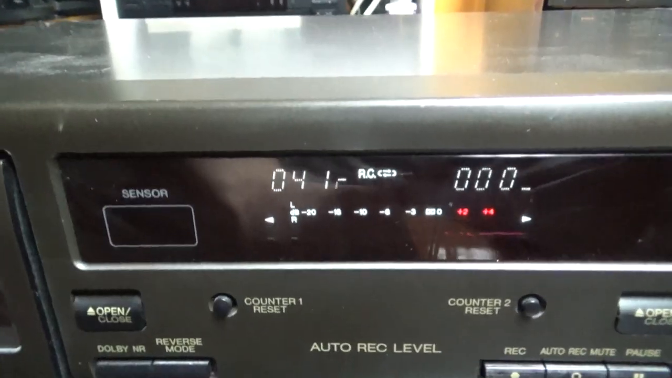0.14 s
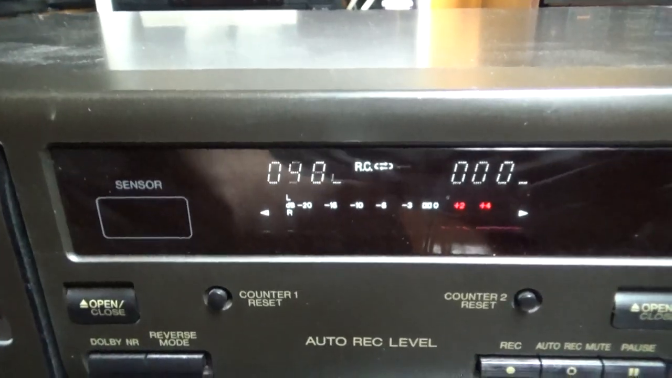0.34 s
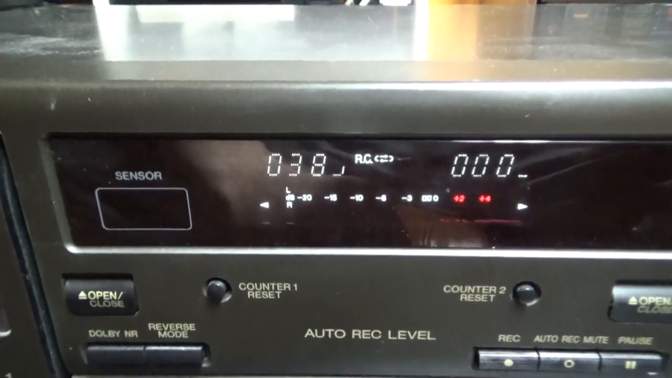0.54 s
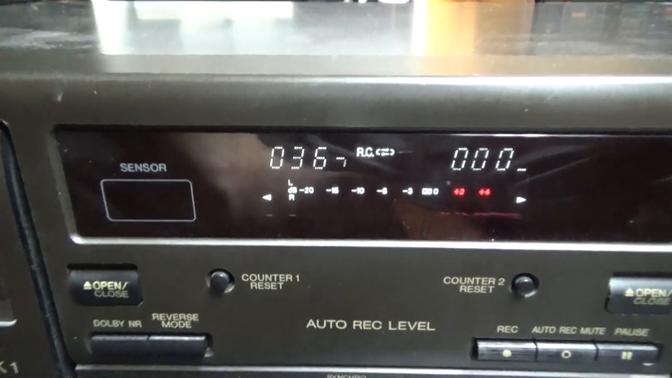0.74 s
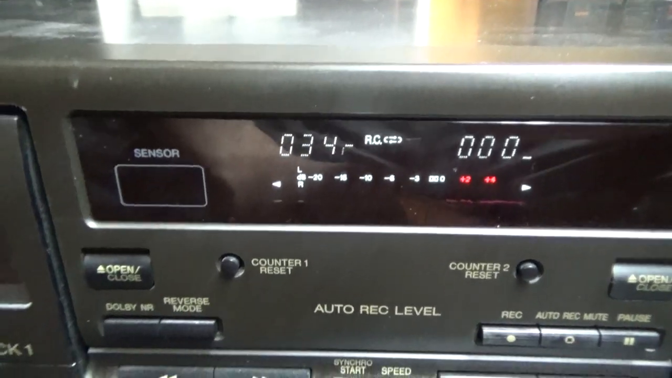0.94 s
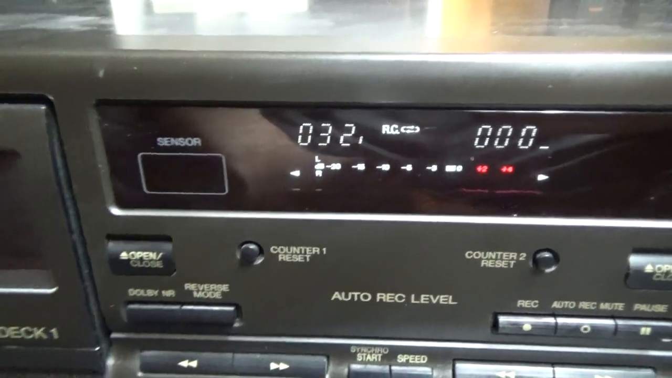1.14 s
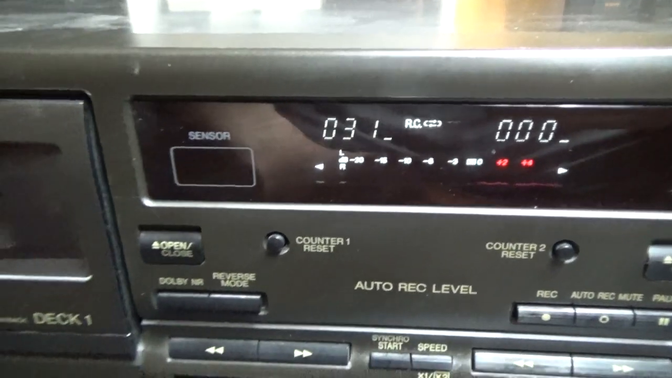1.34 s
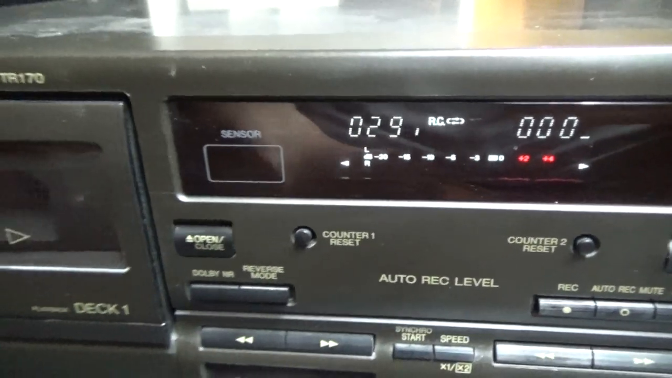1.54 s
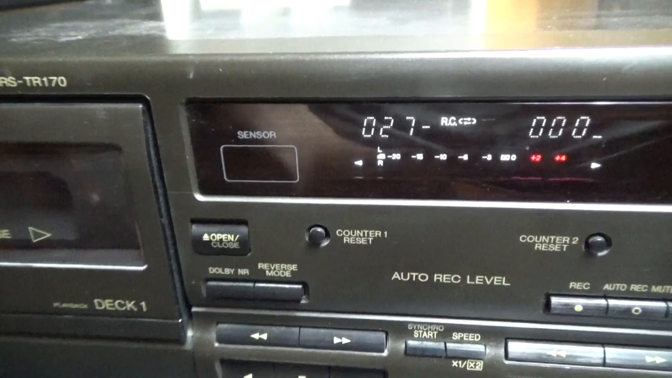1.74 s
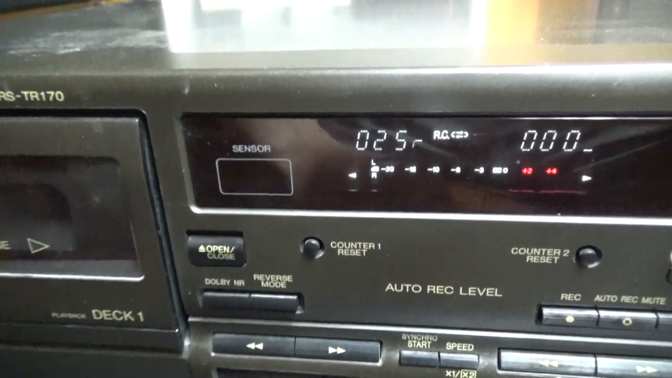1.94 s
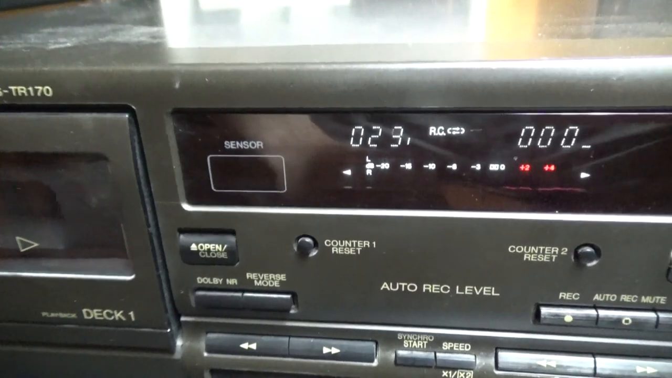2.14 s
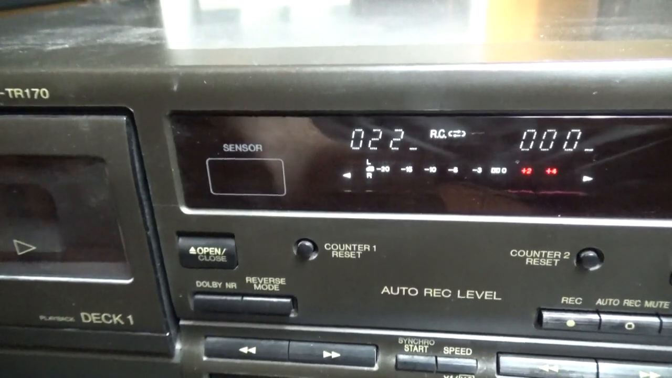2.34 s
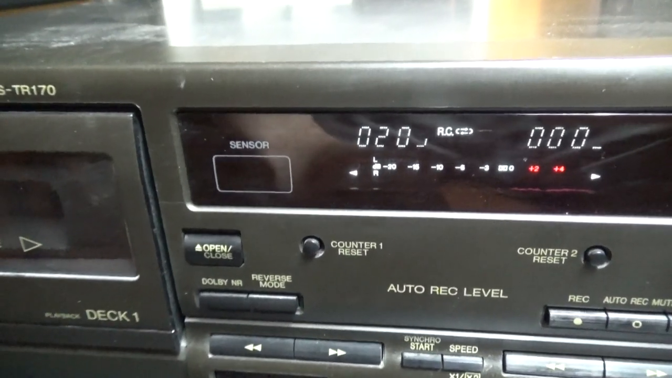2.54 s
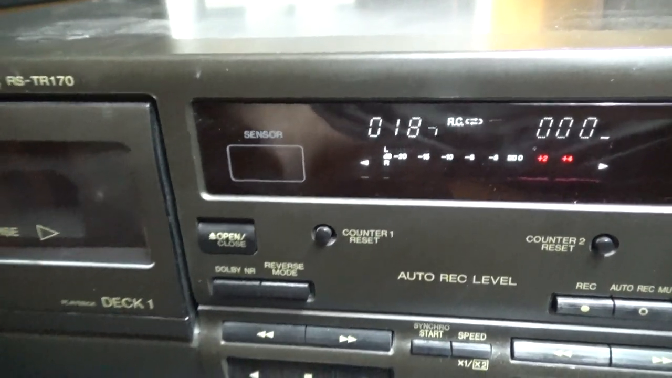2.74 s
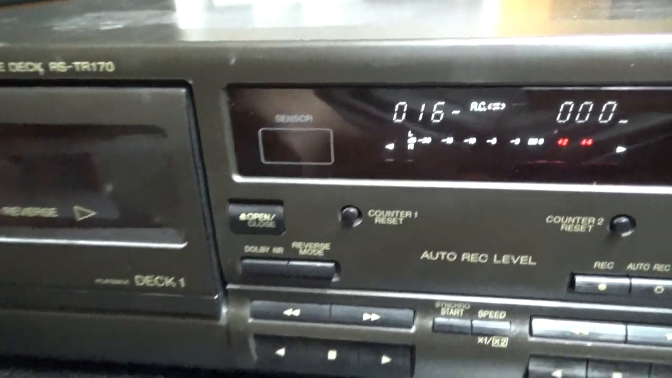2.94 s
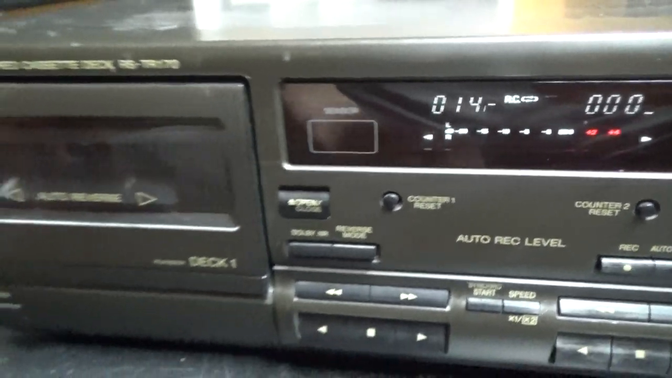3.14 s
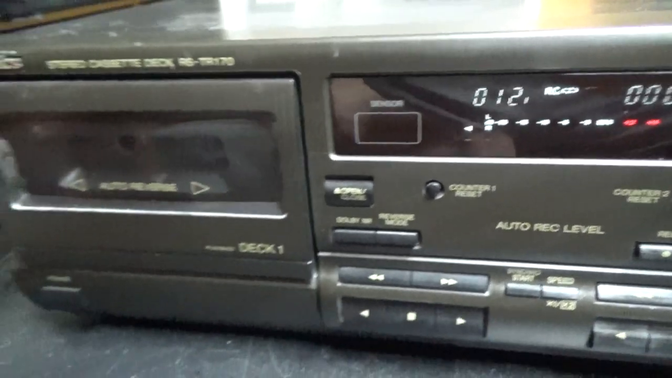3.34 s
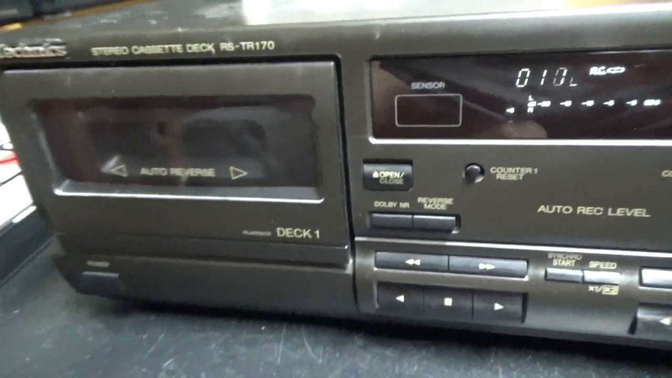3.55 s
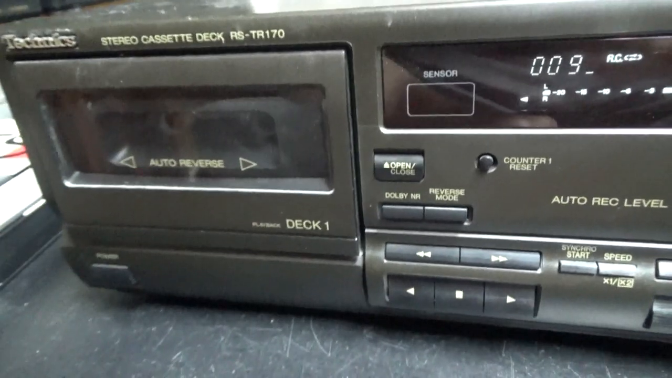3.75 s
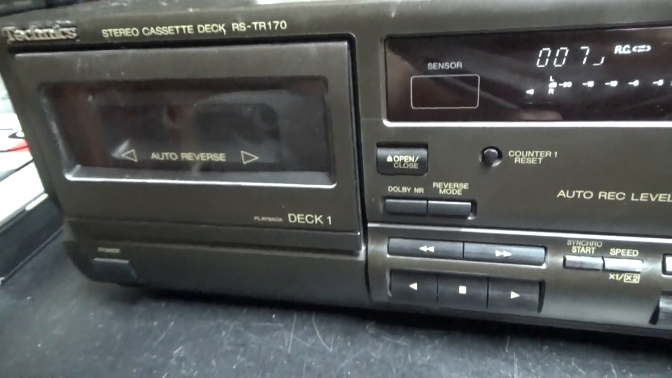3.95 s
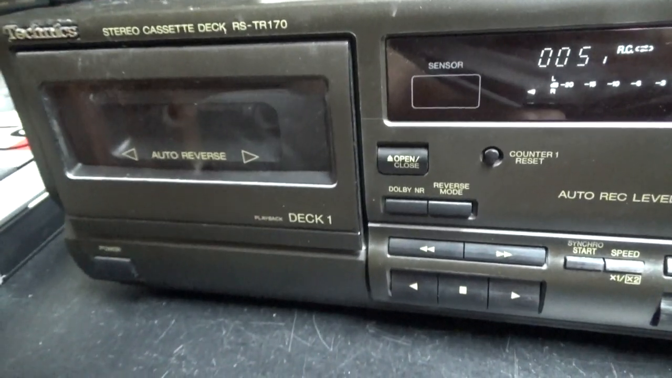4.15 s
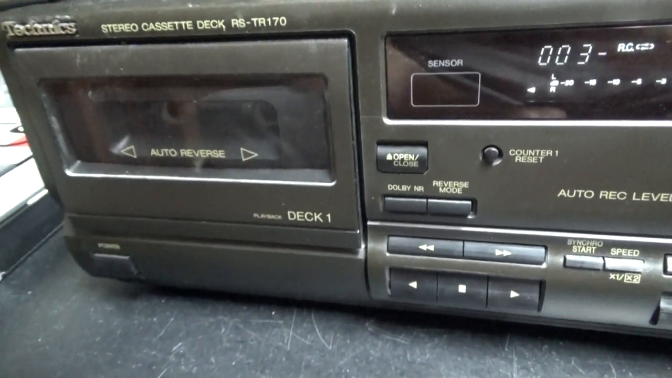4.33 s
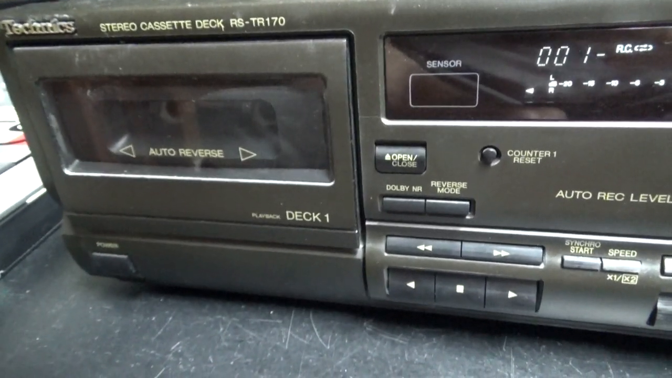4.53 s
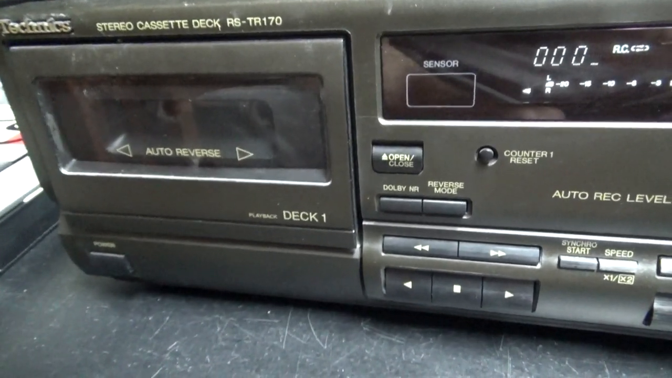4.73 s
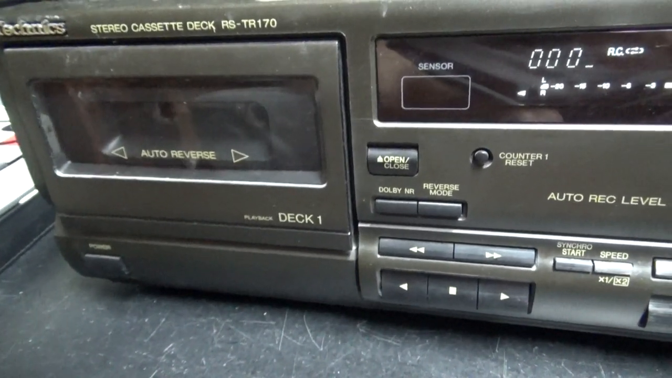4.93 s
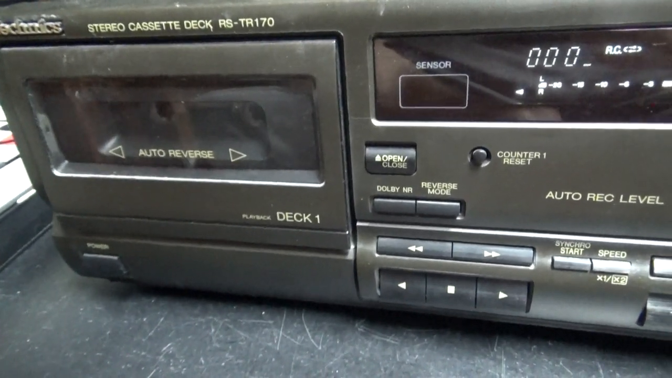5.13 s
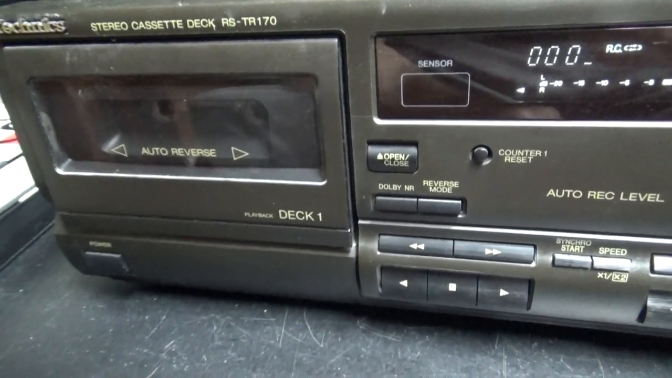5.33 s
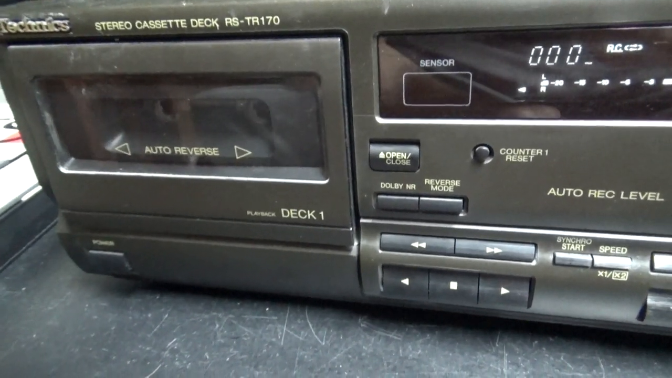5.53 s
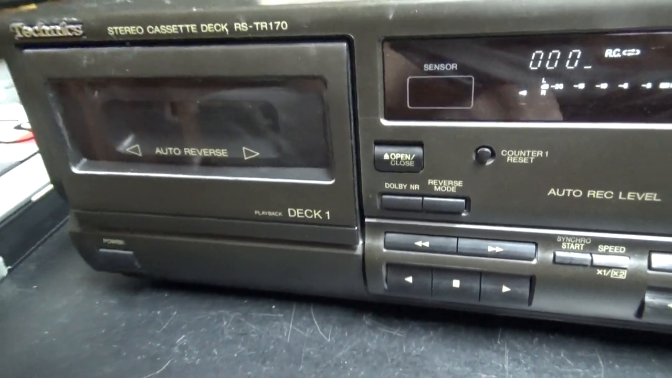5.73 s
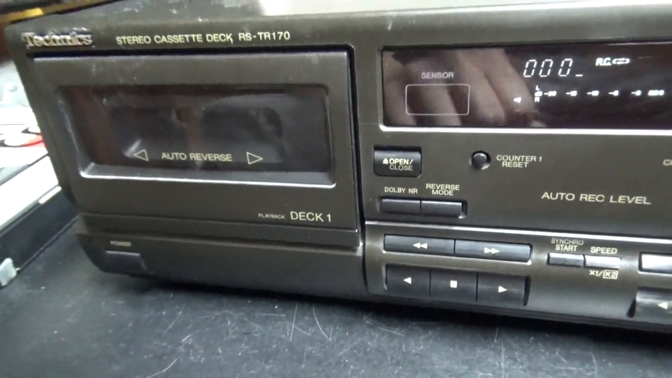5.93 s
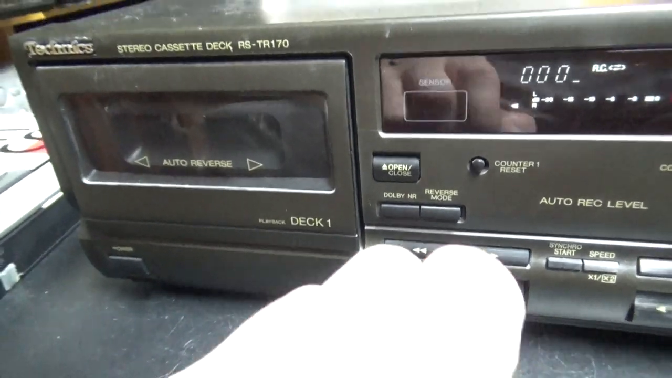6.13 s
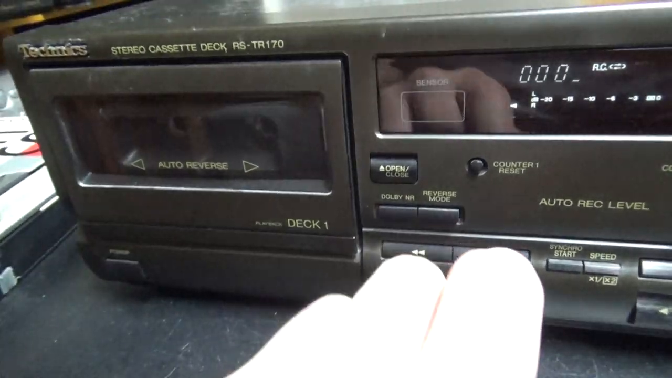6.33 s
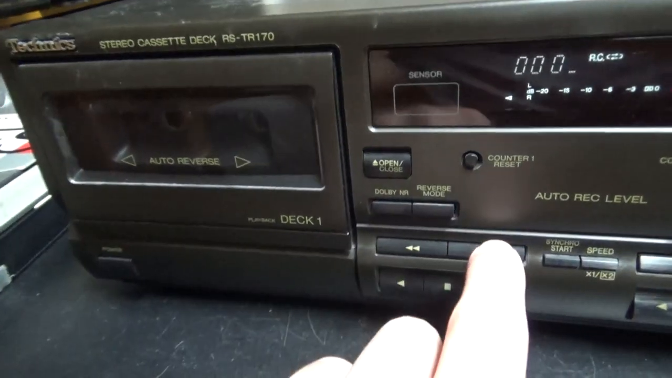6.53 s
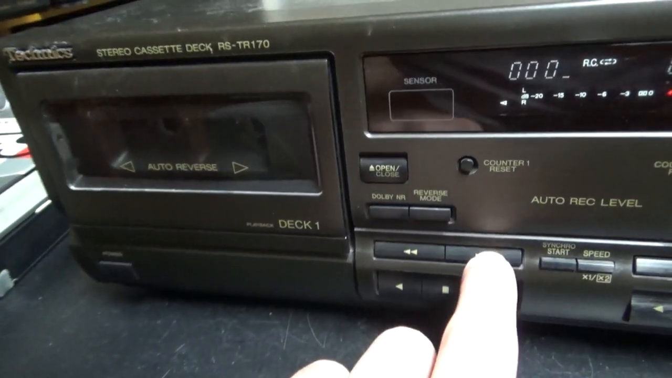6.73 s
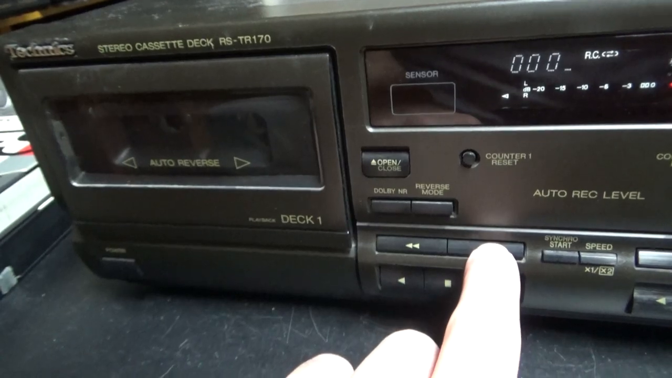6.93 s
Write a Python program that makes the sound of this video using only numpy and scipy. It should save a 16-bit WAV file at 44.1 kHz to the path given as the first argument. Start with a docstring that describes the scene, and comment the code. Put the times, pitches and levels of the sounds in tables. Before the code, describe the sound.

Recorded close in a small, quiet room with a short, dry tail. From 0 to about 4.7 seconds a cassette deck rewinds: a steady, buzzy gear whine around 415 hertz over a hollow motor whir, barely sinking in pitch. On top, loose plastic hubs tick, rattle and scuff in irregular bursts, roughly three a second, bright and dry, with thin tape hiss swelling alongside; a dry snap falls near 1.5. At 4.7 the brake clacks hard in a tight cluster and the whir stops at once. Faint idling hiss stays until about 5.2, when the mechanism drops back with a louder, fuller clunk, several knocks packed into a tenth of a second. The hiss fades, leaving low room tone and sinking mains hum. At about 6.45 a finger touches a key with a soft dull tap; near 6.95 comes a small, brighter click, ending at about 7.

```python
"""Cassette deck rewinding in a small quiet room

Heard close by: the reel motor whines through its gears (shaft harmonics over housing-coloured noise) and
the loose hubs rattle in the shell (clicks and scuffs through resonances); tape hisses over its guides.
At the tape's end the brake clacks, the capstan idles on as hiss and the mechanism drops back in three knocks;
later a finger taps two keys. Blows ring damped modes. Room tone, rumble and mains hum lie beneath.
"""
import sys
import numpy as np
from scipy import signal
from scipy.fft import rfft, irfft
from scipy.io import wavfile

SR = 44100
rng = np.random.default_rng(int(sys.argv[2]) if len(sys.argv) > 2 else 0)


def attenuation_scalar(level_db):
    """Turn a level in dB into a linear amplitude multiplier (20 dB per decade)."""
    decades = np.asarray(level_db, float) / 20
    return 10 ** decades


def output_pcm(signal):
    """Save a mono or channel-first signal as 16-bit PCM at the path in sys.argv[1].

    Samples are clipped to [-1, 1] before scaling.
    """
    pcm = np.clip(np.atleast_2d(signal).T, -1, 1) * 32767
    wavfile.write(sys.argv[1], SR, np.round(pcm).astype(np.int16))


N = 307818   # samples

# reel drive: time_s, gear_mesh_hz, reference_tone_db
DRIVE_CURVE = [(0, 418, -50.5), (1.5, 417.3, -50), (3, 416, -50), (3.4, 415.5, -51.5), (4.7, 414.5, -51.5)]
# shaft harmonics: multiple_of_shaft_speed, relative_db, left_lead_rad
SHAFT_ORDERS = [(5, -6, 0.045), (6, -6, 0.059), (8, 1, 0.067), (9, -14.5, 0.35), (15, -5.5, 0.18),
                (16, -1, 0.12), (17, -10, 0.41)]
# drive noise level: time_s, level_db
DRIVE_NOISE_CURVE = [(0.0, -49), (2.5, -49.5), (4.7, -50.5)]
# drive noise colour: freq_hz, relative_db_per_hz
DRIVE_SPECTRUM = [(47, -40), (80, -23), (151, -12.5), (305, -4), (365, -1.5), (414, -4.5), (594, -12.5),
                  (823, 0), (985, -12.5), (1220, -5.5), (1790, -10.5), (6000, -18), (7800, -54),
                  (13200, -120)]
# housing resonances on the drive noise: centre_hz, width_hz, peak_gain_db
HOUSING_PEAKS = [(249.3, 60, 6), (386, 6.7, 6.5), (775, 37, 7), (1081, 48, 10), (1222, 18, 9),
                 (1566, 70, 7)]
# reel out of true rubbing its hub once a turn: start_s, end_s, chatter_db
HUB_RUBS = [(-0, 0.166, -40), (0.413, 0.586, -43.5), (0.607, 0.698, -44.5), (.76, 0.92, -39),
            (1.087, 1.202, -42), (1.437, 1.598, -38.5), (1.723, 1.923, -40.5), (2.0, 2.222, -43),
            (2.326, 2.52, -40), (2.638, 2.815, -41.5), (2.897, 3.07, -40.5), (3.257, 3.4, -44),
            (3.57, 3.654, -44), (3.827, 3.943, -43.5), (4.065, 4.13, -45), (4.314, 4.395, -42),
            (4.626, 4.72, -38.5)]
# loudest hub ticks: time_s, bright_db, dull_db
HUB_TICKS = [(0.032, -30, -31), (0.0683, -23.5, -28.5), (0.105, -23, -35), (0.124, -29, -30),
             (0.163, -28, -33), (.362, -57, -35), (.38, -53, -39), (0.3978, -23.5, -33), (0.435, -39, -38),
             (0.444, -31, -37), (0.471, -30.5, -34), (0.509, -29.5, -37), (.6503, -27.5, -41),
             (0.684, -28.5, -41), (.834, -45, -38), (0.8483, -37, -39), (.889, -40, -36),
             (0.9377, -28, -65), (1.087, -40, -36.5), (1.101, -29, -47), (1.1223, -36, -34),
             (1.1563, -28.5, -45), (1.197, -35, -32.5), (1.35, -35.5, -40), (1.4406, -40, -53),
             (1.5232, -37, -42), (1.577, -24.5, -32.5), (1.6088, -26.5, -40), (1.755, -28.5, -34.5),
             (1.7888, -27, -54), (1.8792, -25.5, -60), (1.95, -32, -53), (2.0157, -29, -43),
             (2.0256, -28, -33), (2.117, -20, -39), (2.1655, -33, -45), (2.174, -29, -31.5),
             (2.2935, -37, -51), (2.353, -34, -45), (2.3777, -30, -54), (2.4429, -30, -32.5),
             (2.4953, -24.5, -51), (2.665, -33, -42), (2.7122, -26, -42), (2.7661, -26, -53),
             (2.772, -28, -32), (2.8162, -32, -51), (2.8527, -33, -42), (2.895, -33, -33.5),
             (2.983, -29, -38.5), (3.024, -28.5, -53), (3.057, -28.5, -39), (3.104, -34, -53),
             (3.3088, -27.5, -57), (3.3653, -25, -45), (3.3852, -22, -33.5), (3.51, -26.5, -40),
             (3.5785, -27, -48), (3.73, -34, -40), (3.8157, -35, -37.5), (3.87, -34, -44),
             (3.911, -30.5, -45), (3.93, -36, -53), (4.051, -36, -39), (4.1, -29.5, -38), (4.293, -35, -50),
             (4.4052, -28, -52), (4.526, -23, -33), (4.66, -32, -40)]
# hub and shell resonances: freq_hz, width_hz, relative_db
HUB_MODES = [(1947, 58, -6), (2776, 285, -1), (3337, 55, -4), (3560, 170, -7.5), (3890, 110, -9),
             (4853, 110, -1), (7115, 85, -3.5), (7390, 145, -5.5), (8350, 98, -23.5), (8540, 56, 1.5),
             (9300, 130, -2.5), (10060, 110, -5), (10670, 56, -11)]
# upper hub sound gaining on the lower as the reel fills: time_s, gain_db
HUB_SHEEN = [(0, -5), (3.0, -4), (3.6, -1.5), (4.7, 0)]
# dry snap: time_s, level_db (before band-pass)
SNAP_EVENTS = [(1.506, -10)]
# brake and mechanism knocks; rows at 4.7005 and 5.1825 are only a gradual rise heard just ahead of a knock:
# time_s, high_db, mid_db, low_db, air_db, burst_t60_s
CHASSIS_EVENTS = [(4.7005, -11, -39, -49, -30, 0.031), (4.7046, -19, -15, -53, -16, 0.097),
                  (4.7113, -11.5, -16, -12, -17, 0.037), (4.723, -22.5, -22, -18, -29, 0.12),
                  (4.7513, -28, -47, -19, -43, 0.093), (5.1825, -34, -37, -50, -44, 0.03),
                  (5.1868, -4.5, -7.5, -38, -12, 0.027), (5.1974, -36, -13.5, -14.5, -46, 0.073),
                  (5.2114, -21, -14, -47, -38, 0.075), (5.2248, -16, -8.5, -21.5, -33, 0.088),
                  (5.2371, -34, -9.5, -13, -39, 0.053), (5.2648, -13, -7.5, -14, -25, 0.052),
                  (5.2822, -44, -14, -18.5, -47, 0.048)]
# chassis modes: freq_hz, relative_db, t60_s
CHASSIS_MODES = [(121.4, -3, 0.26), (181.5, -9, 0.2), (214.6, -12, 0.18), (244.5, 7, 0.18), (280, -1, 0.19),
                 (341, -8, 0.4), (503, -3.5, 0.13), (748, 1, 0.11), (829, 7, 0.055), (884, -15, 0.071),
                 (1066, -4, 0.036), (1200, 0, 0.054), (1426, -5, 0.065), (1497, 0, 0.047),
                 (2010, -8.5, 0.13), (2650, 3, 0.019), (3420, -6, 0.05), (4730, -16.5, 0.0414),
                 (6900, -2, 0.033), (7580, 1.5, 0.046), (8230, 0.5, 0.019)]
# finger on two keys: time_s, high_db, mid_db, low_db, air_db, burst_t60_s
KEY_TAPS = [(6.4412, -48, -30, -26.5, -56, 0.028), (6.4535, -77, -30, -27, -64, 0.02),
            (6.9377, -21, -29, -31, -50, 0.012), (6.9617, -64, -33, -61, -62, 0.027)]
# key and panel modes: freq_hz, relative_db, t60_s
KEY_MODES = [(166.5, -1, 0.09), (263, 2, 0.12), (321, 6.5, 0.1), (498, 6.5, 0.12), (704, 4, 0.092),
             (956, 9, 0.04), (1260, 6.5, 0.044), (1510, 3, 0.044), (2040, 6, 0.026), (2370, 9, 0.022),
             (2726, 9, 0.029), (3330, -4, 0.051), (3960, 4, 0.014)]
# stereo lean of the blows' colour: freq_hz, left_minus_right_db
BLOW_LEAN = [(90, 0), (400, -0.5), (1800, -2.5), (7000, 1), (13000, -0.5)]
# tape over guides, base level: time_s, base_db
TAPE_CURVE = [(0.0, -58), (1.0, -61), (4.4, -50), (4.68, -59)]
# tape hiss colour: freq_hz, relative_db_per_hz
TAPE_SPECTRUM = [(6000, -30), (9000, -1), (10800, 0), (12000, -20.5), (14000, -6), (15600, -10),
                 (16000, -46)]
# capstan level: time_s, level_db
CAPSTAN_CURVE = [(0, -51.5), (5.18, -54), (5.3, -60), (5.6, -80)]
# capstan hiss colour: freq_hz, relative_db_per_hz
CAPSTAN_SPECTRUM = [(1200, -16), (2700, -15), (3500, -23), (6800, -18), (7200, -9), (10050, -9),
                    (10400, -20), (13100, -19), (13400, -15), (13700, -22), (15700, -26), (16000, -60)]
# deck's stereo balance: time_s, left_minus_right_db
DECK_BALANCE = [(0.0, 1.4), (4.1, -0.7), (4.6, 0.0)]
# bench echo, row per channel, left first: lag_s, gain_db
BENCH_ECHO = [(.0011, -20), (.0016, -23)]
# room decay: band_centre_hz, t60_s, side_to_mid_ratio
ROOM_DECAY = [(141, 0.58, 0.1), (470, 0.43, 0.46), (1490, 0.22, 0.45), (5370, 0.13, 1), (11700, 0.07, 0.52)]
# room tone colour: freq_hz, relative_db_per_hz
ROOM_SPECTRUM = [(44, -31), (75, 1), (140, -10.5), (183, -8.5), (219, -11.5), (300, -11), (392, -11),
                 (654, -16), (875, -12), (1560, -24), (3420, -23.5), (4370, -28), (7630, -28), (15600, -35)]
# stereo likeness of all noises: freq_hz, left_right_correlation
STEREO_LIKENESS = [(60, .999), (250, .97), (1000, 0.81), (3000, 0.66), (8000, 0.84), (13000, 1)]
# mains hum partials: freq_hz, relative_db
HUM_PARTIALS = [(59.2, -4.5), (118.5, -17), (178.5, -12.5), (237, -15), (296, -11.5)]
# hum reference level: time_s, reference_db
HUM_CURVE = [(0.0, -51.5), (5.5, -52.5), (6.3, -57.5), (6.98, -58)]

SHAFT_TEETH = 8
CHATTER_REST_DB = -51


def rms_one(x):
    """Scale to rms 1."""
    return x / np.sqrt(np.mean(x ** 2) + 1e-20)


def in_time(rows):
    """Interpolate each column of a time curve at every sample."""
    time_s, *columns = np.transpose(rows)
    return [np.interp(np.arange(N) / SR, time_s, column) for column in columns]


def at_hz(points, hz):
    """Interpolate a table on a log-frequency axis."""
    table_hz, values = np.transpose(points)
    return np.interp(np.log(hz), np.log(table_hz), values)


def drift(rate_hz):
    """Slow random wander of rms 1: two-pole low-passed noise, made at SR / 40."""
    r = np.exp(-80 * np.pi * rate_hz / SR)
    white = rng.standard_normal(N // 40 + 2002)
    slow = rms_one(signal.lfilter([1], [1, -2 * r, r * r], white)[2000:])
    return np.interp(np.arange(N) / 40, np.arange(len(slow)), slow)


def resonance(x, hz, width_hz):
    """Two-pole resonance, peak gain 1."""
    r = np.exp(-np.pi * width_hz / SR)
    zeros = [(1 - r * r) / 2, 0, (r * r - 1) / 2]
    poles = [1, -2 * r * np.cos(2 * np.pi * hz / SR), r * r]
    return signal.lfilter(zeros, poles, x + 1e-18)   # offset avoids denormals


def band(x, low_hz, high_hz):
    """Butterworth band-pass."""
    return signal.sosfilt(signal.butter(2, [low_hz, high_hz], "band", fs=SR, output="sos"), x)


def noise(spectrum, peaks=()):
    """Coloured stereo noise, rms 1: mid and side mixed for the tabled channel correlation."""
    hz = np.maximum(np.fft.rfftfreq(N, 1 / SR), 1)
    gain = attenuation_scalar(at_hz(spectrum, hz))
    for centre_hz, width_hz, peak_db in peaks:
        gain = gain * (1 + (attenuation_scalar(peak_db) - 1) / (1 + (2 * (hz - centre_hz) / width_hz) ** 2))
    mid, side = rfft(rng.standard_normal((2, N))) * gain
    alike = np.clip(at_hz(STEREO_LIKENESS, hz), 0, 1)
    stereo = np.sqrt(1 + alike) * mid + np.sqrt(1 - alike) * side * [[1], [-1]]
    return rms_one(irfft(stereo, N))


def burst(rise_s, t60_s, size):
    """Burst envelope: quick rise, exponential fall."""
    t = np.arange(size) / SR
    return (1 - np.exp(-t / max(rise_s, 1e-4))) * attenuation_scalar(-60 * t / max(t60_s, 1e-3))


def running():
    """Gate: 1 while the reels turn, ramping to 0 as the brake clacks."""
    stop_s = CHASSIS_EVENTS[0][0] + 0.025
    return np.clip((stop_s - np.arange(N) / SR) / 0.012, 0, 1)


def drive():
    """Reel motor: wavering harmonics of shaft speed over housing noise throbbing with each turn."""
    mesh_hz, tone_db = in_time(DRIVE_CURVE)
    noise_db, = in_time(DRIVE_NOISE_CURVE)
    speed_wander, waver_db = 0.001, 1.5
    shaft_hz = mesh_hz / SHAFT_TEETH * (1 + speed_wander * drift(4.6))
    turns = np.cumsum(shaft_hz) / SR
    tones = 0
    for order, order_db, lead_rad in SHAFT_ORDERS:
        lead = np.array([[lead_rad / 2], [-lead_rad / 2]])
        phase = 2 * np.pi * (round(order) * turns + rng.random()) + lead
        level = attenuation_scalar(tone_db + order_db + waver_db * drift(24.0))
        tones = tones + level * np.sqrt(2) * np.sin(phase)
    hiss = noise(DRIVE_SPECTRUM, HOUSING_PEAKS)
    hiss /= np.std(band(hiss, 900, 1800))   # noise level refers to this band
    throb = 1 + 0.19 * np.sin(2 * np.pi * turns)   # shaft bears harder once a turn
    return (tones + attenuation_scalar(noise_db + 1.0 * drift(35.0)) * throb * hiss) * running()


def chatter():
    """Hub chatter level in dB: each rub rises, grows to its end, then falls to rest."""
    t = np.arange(N) / SR
    rise_db_per_s, fall_db_per_s, growth_db = 122, 256, 3
    rubs = []
    for start_s, end_s, peak_db in HUB_RUBS:
        rise_db = rise_db_per_s * np.maximum(start_s - t, 0)
        fall_db = fall_db_per_s * np.maximum(t - end_s, 0)
        ungrown_db = growth_db * np.clip((end_s - t) / (end_s - start_s), 0, 1)
        rubs.append(peak_db - rise_db - fall_db - ungrown_db)
    return np.maximum(np.max(rubs, axis=0), CHATTER_REST_DB)


def hub_body(x, modes, low_hz, high_hz, scratch_db):
    """Hub response: parallel resonances of alternating sign plus a broad scratch band."""
    rings = 0
    for k, (hz, width_hz, mode_db) in enumerate(modes):
        rings = rings + (-1) ** k * attenuation_scalar(mode_db) * resonance(x, hz, width_hz)
    return rings + attenuation_scalar(scratch_db) * band(band(x, low_hz, high_hz), low_hz, high_hz)


def hubs():
    """Loose hubs: dense clicks, a per-turn rattle and scuffing ticks excite dull and bright modes."""
    chatter_db, (sheen_db,), (mesh_hz, _) = chatter(), in_time(HUB_SHEEN), in_time(DRIVE_CURVE)
    sizes = attenuation_scalar(3.36 * np.minimum(rng.exponential(1, N), 4)) * rng.choice([-1, 1], N)
    clicks = rng.random(N) < 1600 * attenuation_scalar(4.0 * drift(25.0)) / SR   # nominally 1600 per s
    grains = rms_one(sizes * clicks) * attenuation_scalar(chatter_db) * running()
    turn_at = np.flatnonzero(np.diff(np.floor(np.cumsum(mesh_hz / SHAFT_TEETH) / SR)))
    probe, ticks = rng.standard_normal(20000), np.array(HUB_TICKS)
    low = [mode for mode in HUB_MODES if mode[0] < 5800]
    high = [mode for mode in HUB_MODES if mode[0] >= 5800]
    jitter_turns, spread_db = 0.28, 5.5
    # tick_db, modes, scratch low_hz, high_hz, scratch_db, tick_t60_s, grains_db, rattle_db
    parts = ((ticks[:, 2], low, 1800, 5500, -18, 0.03, -12, -3),
             (ticks[:, 1], high, 6000, 11500, -7, 0.022, -4, 3))
    out = 0
    for tick_db, modes, low_hz, high_hz, scratch_db, t60_s, grains_db, rattle_db in parts:
        late, own = rng.standard_normal((2, len(turn_at)))
        delay = jitter_turns * late * SR * SHAFT_TEETH / mesh_hz[turn_at]
        at = np.clip(turn_at + delay, 0, N - 1).astype(int)
        hits = np.zeros(N)
        hits[at] = attenuation_scalar(chatter_db[at] + rattle_db + spread_db * own) * running()[at]
        hits[np.round(ticks[:, 0] * SR).astype(int)] = attenuation_scalar(tick_db)
        envelope = signal.fftconvolve(hits, burst(0.0004, t60_s, size=3000))[:N]
        scuffs = envelope * rng.choice([-1, 1], N)
        body = (modes, low_hz, high_hz, scratch_db)
        struck = hub_body(scuffs + attenuation_scalar(grains_db) * grains, *body)
        out = out + struck / np.std(hub_body(probe, *body))   # unit gain for white noise
    under, over = band(out, 6260, 7930), band(out, 7160, 16500)
    return out + (attenuation_scalar(-sheen_db) - 1) * under + (attenuation_scalar(sheen_db) - 1) * over


def snap():
    """Dry broad click: a short band-passed noise burst."""
    out = np.zeros(N)
    for time_s, level_db in SNAP_EVENTS:
        i = round(time_s * SR)
        out[i:i + 600] = rng.standard_normal(600) * burst(0.0001, 0.008, size=600) * attenuation_scalar(level_db)
    return band(out, 470, 7900)


def blows(events, modes):
    """Each row: a blow and a short noisy push ring damped modes, crack broadly and thud."""
    rise_s, blow_size = 0.0015, 6   # blow relative to push
    crunch_db, thud_db = 2, 10.5   # relative to event columns
    out, size = np.zeros(N + SR), SR // 2
    for time_s, high_db, mid_db, low_db, air_db, t60_s in events:
        rough, deep = rng.standard_normal((2, size))
        push = rough * burst(rise_s, t60_s, size=size)
        colour = [(250, low_db), (1200, mid_db), (7000, high_db)]
        sound = attenuation_scalar(high_db) * band(band(push, 1420, 10500), 1460, 11000)
        sound += attenuation_scalar(mid_db + crunch_db) * band(push, 680, 2690)
        sound += attenuation_scalar(air_db) * band(push, 10300, 13100)
        thud = deep * burst(0.014, 0.22, size=size)   # case follows late
        sound += attenuation_scalar(low_db + thud_db) * band(thud, 159, 339)
        chances = rng.uniform(-0.98, 1, (len(modes), 2))
        for (hz, mode_db, mode_t60_s), (own, lag) in zip(modes, chances):
            width_hz = np.log(1000) / np.pi / mode_t60_s
            lift = np.sqrt(SR / width_hz) / 12   # equal energy gathered by narrow modes
            blow = push.copy()
            blow[round((rise_s + 2 * abs(lag) / hz) * SR)] += blow_size * np.sign(lag)   # within two cycles
            level = attenuation_scalar(mode_db + 2 * own + at_hz(colour, hz))
            sound += level * lift * resonance(blow, hz, width_hz)
        i = round((time_s - rise_s) * SR)
        out[i:i + size] += band(sound, 70, 18000)
    # bright and dull parts come from different parts of the case
    lean_db = at_hz(BLOW_LEAN, np.maximum(np.fft.rfftfreq(N + SR, 1 / SR), 1))
    return irfft(rfft(out) * attenuation_scalar(lean_db / 2 * [[1], [-1]]), N + SR)[:, :N]


def tape():
    """Tape sliding over guides: coloured noise whose level follows hub chatter and wavers."""
    base_db, = in_time(TAPE_CURVE)
    swing_db = 0.98 * (chatter() - CHATTER_REST_DB - 8)
    return attenuation_scalar(base_db + swing_db + 2.0 * drift(10.0)) * running() * noise(TAPE_SPECTRUM)


def capstan():
    """Idling capstan: coloured hiss, fading as the mechanism drops back."""
    level_db, = in_time(CAPSTAN_CURVE)
    return attenuation_scalar(level_db) * noise(CAPSTAN_SPECTRUM)


def bench_echo(close):
    """Bench reflection: one delayed copy added per channel."""
    out, n = close.copy(), np.arange(N)
    for side, (lag_s, gain_db) in enumerate(BENCH_ECHO):
        out[side] += attenuation_scalar(gain_db) * np.interp(n - lag_s * SR, n, close[side], left=0)
    return out


def room(x):
    """Diffuse tail: decaying noise bands, faster in the treble, alike left and right in the bass."""
    size = SR // 2
    t, tail = np.arange(size) / SR, 0
    for hz, t60_s, apart in ROOM_DECAY:
        white = rng.standard_normal((2, size))
        mid, side = band(white, hz / 2.0, min(hz * 2.26, 18000)) * attenuation_scalar(-60 * t / t60_s)
        tail = tail + mid + apart * side * [[1], [-1]]
    tail = tail * np.clip(t / 0.0048, 0, 1)
    tail /= np.sqrt(np.sum(tail ** 2) / 2)
    return signal.fftconvolve(x[None], tail, axes=1)[:, :N]


def background():
    """Room tone noise, deep rumble, and mains hum partials sinking towards the end."""
    room_db, rumble_db, hum_waver_db = -57.5, -70, 1
    t, (hum_db,) = np.arange(N) / SR, in_time(HUM_CURVE)
    hum_db = hum_db + hum_waver_db * drift(0.39)
    hum = 0
    for hz, partial_db in HUM_PARTIALS:
        hum = hum + attenuation_scalar(partial_db + hum_db) * np.sqrt(2) * np.sin(2 * np.pi * (hz * t + rng.random()))
    rumble = attenuation_scalar(rumble_db) * rms_one(band(rng.standard_normal(N), 28, 46))
    return attenuation_scalar(room_db) * noise(ROOM_SPECTRUM) + rumble + hum


def scene():
    """Sum the close deck, its room tail and the background."""
    balance_db, = in_time(DECK_BALANCE)
    balance = attenuation_scalar([balance_db / 2, -balance_db / 2])
    close = blows(CHASSIS_EVENTS, CHASSIS_MODES) + blows(KEY_TAPS, KEY_MODES)
    close = bench_echo(close + (hubs() + snap()) * balance)
    wet_db = -10.5
    wet = attenuation_scalar(wet_db) * room(close.mean(axis=0))
    return close + wet + (drive() + tape()) * balance + capstan() + background()


def band_limit(x):
    """A steep low-pass at the top of the band."""
    return signal.sosfilt(signal.butter(12, 16510, fs=SR, output="sos"), x)


def record(dry):
    """Steep low-pass on the finished mix."""
    cut = signal.sosfilt(signal.cheby2(14, 50, 16500, fs=SR, output="sos"), dry)   # order, stop_db, edge_hz
    return band_limit(cut)


dry = scene()
out = record(dry)
output_pcm(out)
```